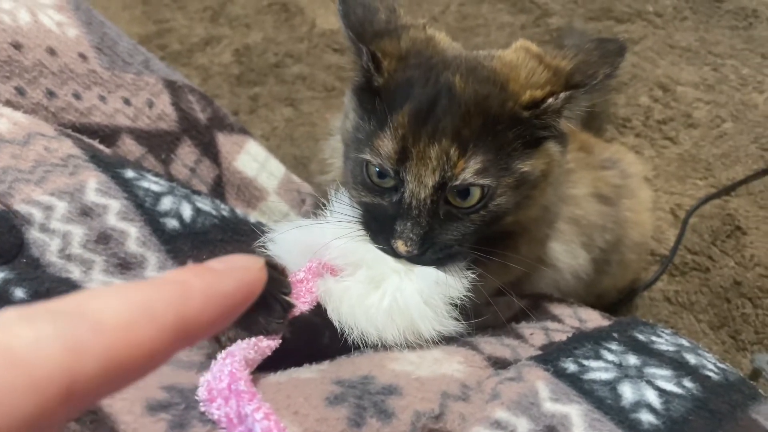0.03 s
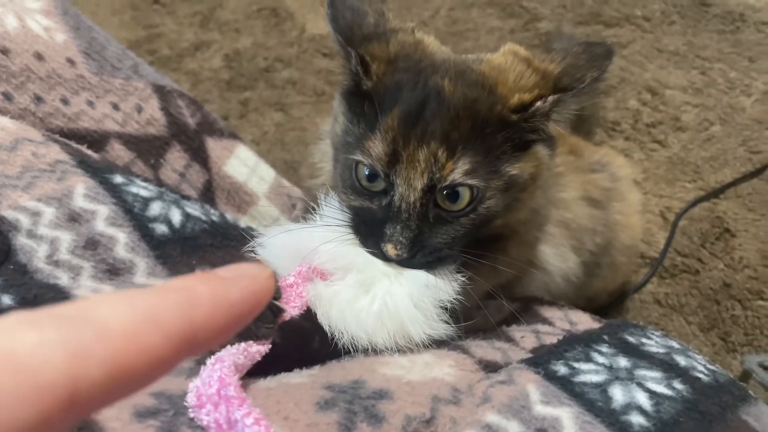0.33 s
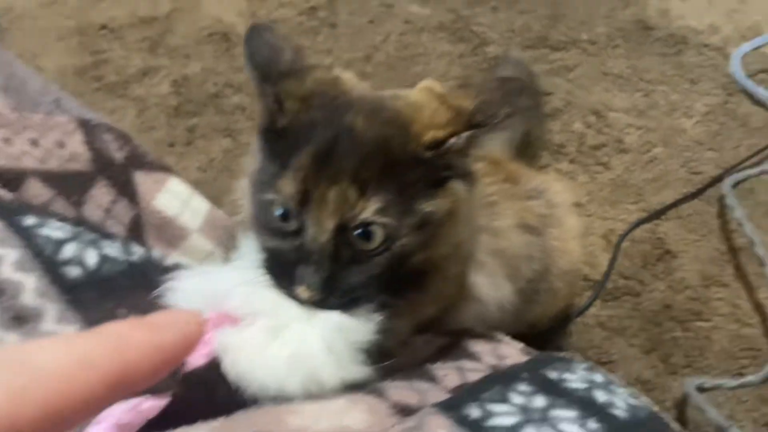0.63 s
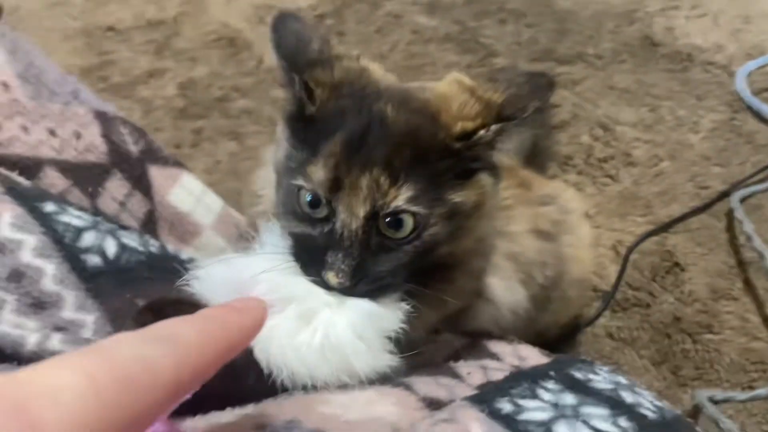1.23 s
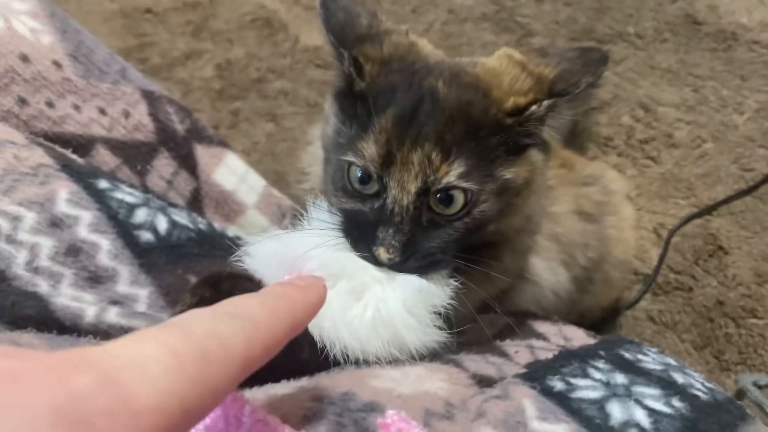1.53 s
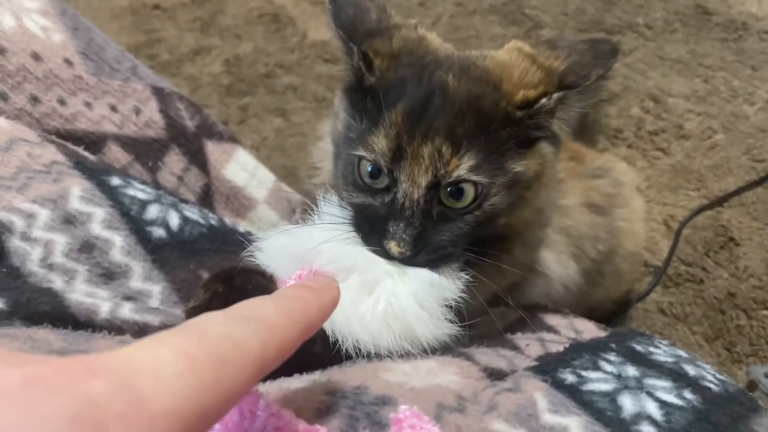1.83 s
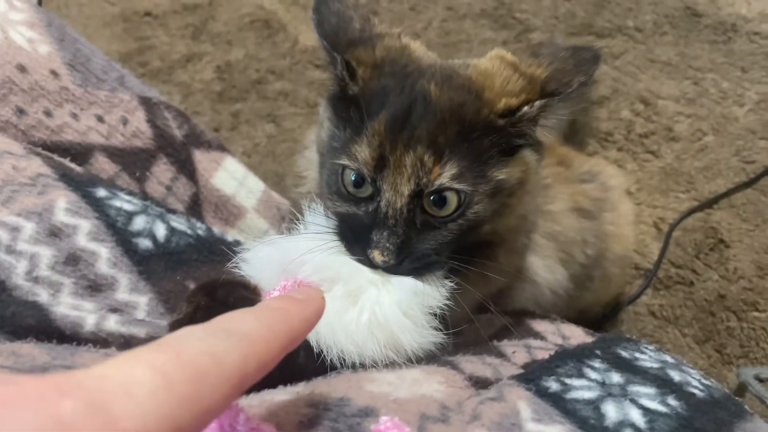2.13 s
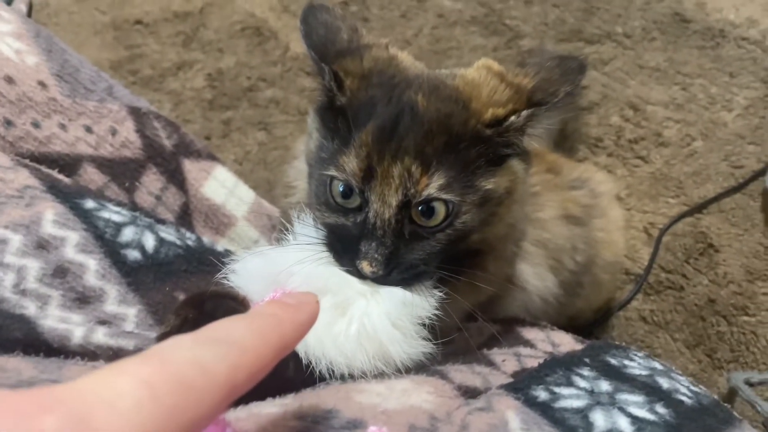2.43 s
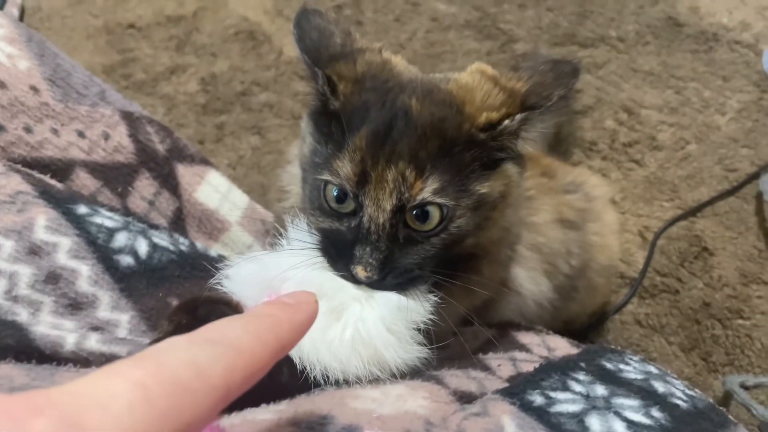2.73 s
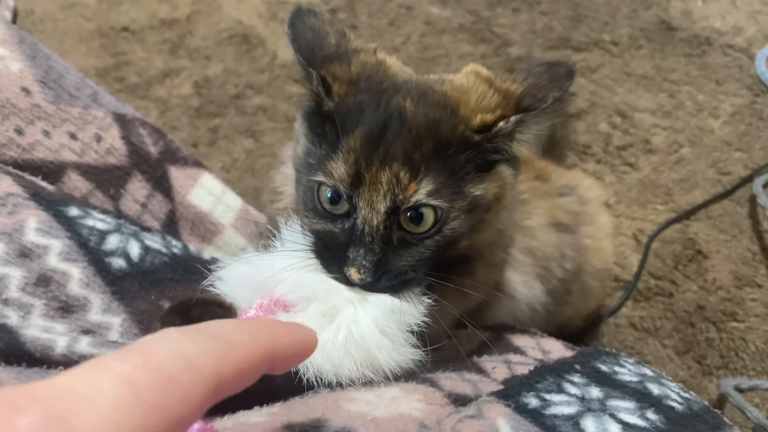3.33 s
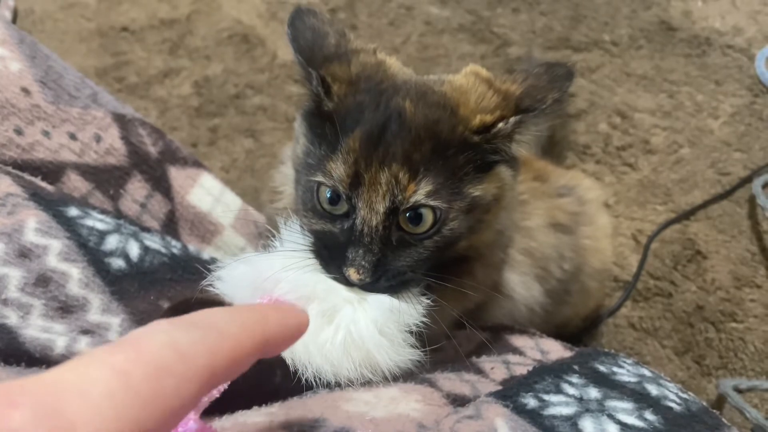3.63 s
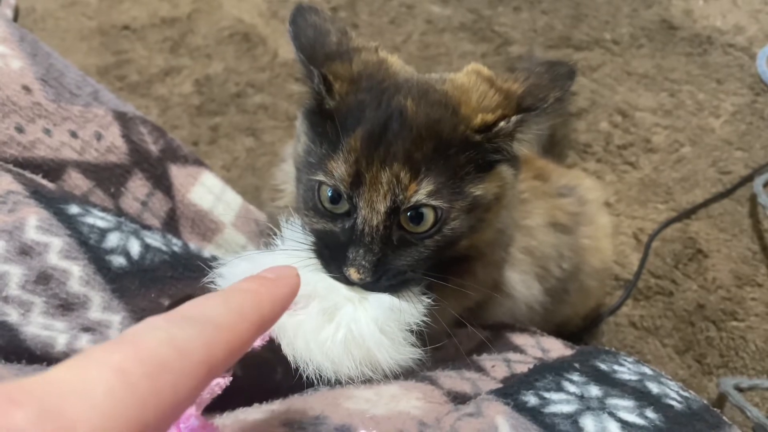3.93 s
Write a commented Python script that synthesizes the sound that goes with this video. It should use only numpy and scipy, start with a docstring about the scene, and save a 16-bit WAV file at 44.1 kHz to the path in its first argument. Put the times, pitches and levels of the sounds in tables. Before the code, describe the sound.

Close by, a kitten growls without a break over a fluffy toy, its tone growing raspy, fluttering and slightly weaker. Early on come a faint scuff of blanket and a soft thud, over a low room hum.

```python
"""One long, low growl, close by: a kitten guards a fluffy toy in a carpeted room.
Its vocal folds pulse through the resonances of throat, mouth and nose. The growl starts clean,
then a flutter on about every third pulse roughens it while pitch and effort sag.
Turbulent air rasps with each pulse. Friction makes the toy and blanket rustle, tick and scuff
faintly, with one soft thud, over a low room hum."""
import sys
import numpy as np
from scipy import signal
from scipy.fft import rfft, irfft
from scipy.io import wavfile
from scipy.ndimage import uniform_filter1d

SR = 44100
rng = np.random.default_rng(int(sys.argv[2]) if len(sys.argv) > 2 else 0)


def digitize_waveform(pressure):
    """Quantize a signal to 16-bit integers and store it at the path in sys.argv[1].

    Rows of a 2-D input are taken as channels; values are limited to [-1, 1].
    """
    field = np.atleast_2d(pressure).T
    bounded = np.clip(field, -1, 1)
    quanta = np.round(bounded * 32767).astype(np.int16)
    wavfile.write(sys.argv[1], SR, quanta)


N = 176400
TIME = np.arange(N) / SR


# Vibration rate of the vocal folds: time_s, pitch_hz
FOLD_PITCH = [(0,166.8),(.06,173.4),(.15,169.3),(.215,179.6),(.265,177.5),(.295,170.8),(.33,174.9),(.385,179.5),(.42,170.5),(.48,169.2),(.52,156.6),(.585,157.2),(.62,168.3),(.645,160.2),(.67,152.7),(.75,157.3),(.8,153.9),(.84,145.6),(.94,153.3),(1.03,157.4),(1.09,163),(1.16,161.2),(1.23,167.2),(1.27,173),(1.33,163.9),(1.43,170.7),(1.455,165.4),(1.48,178.2),(1.53,169.2),(1.6,171.4),(1.64,166.3),(1.7,166.8),(1.77,166.3),(1.81,162.7),(1.87,169.7),(1.95,161.5),(2.08,160.6),(2.14,161.6),(2.28,155.5),(2.36,162),(2.42,155),(2.62,150.7),(2.68,152.7),(2.77,151.3),(2.84,146.5),(2.9,151.2),(3.13,143.6),(3.25,150),(3.42,147.5),(3.47,143),(3.66,144.1),(3.73,134.6),(3.84,139)]
# Roughness of that vibration: time_s, flutter_depth_ratio, irregularity_ratio, flutter_hz
ROUGHNESS = [(0,.2,.15,55),(.12,.22,.15,55),(.2,.05,.05,55),(.48,.05,.05,70),(.53,.42,.2,80),(.575,.32,.14,80),(.6,.12,.07,81),(.645,.12,.08,81),(.675,.7,.6,60),(.74,.55,.4,55),(.9,.48,.32,48),(1.2,.38,.26,50),(1.47,.34,.24,50),(1.7,.38,.26,45),(2.2,.5,.25,47),(2.35,.25,.16,47),(2.45,.58,.28,47.5),(3.38,.68,.28,48.5),(3.5,.8,.5,46),(3.68,.55,.36,43),(3.8,.62,.42,41)]

def vocal_folds(flutter_cycles=.058, flutter_gain=.095, jitter_cycles=.04, shimmer=.09):
    """Phase and amplitude modulation: a flutter slower than the pitch adds rough sidebands."""
    depth, irregularity, flutter_hz = (curve(ROUGHNESS, column) for column in (1, 2, 3))
    pitch_hz = curve(FOLD_PITCH) * (1 + .015 * irregularity * drift(19))
    flutter_phase = 2 * np.pi * np.cumsum(flutter_hz * (1 + .045 * drift(20))) / SR
    cycles = np.cumsum(pitch_hz) / SR + flutter_cycles * depth * np.sin(flutter_phase)
    cycles += jitter_cycles * irregularity * tremble(65)
    throb = depth * np.cos(flutter_phase)
    strength = 1 + flutter_gain * throb + shimmer * irregularity * tremble(55)
    return cycles, strength, throb


def fold_pulses(cycles, strength, lead_cycles=.2):
    """Fourier series of a pulse train: the slow opening of the folds leads their closure."""
    return strength * sum(np.cos(2 * np.pi * (k * cycles + lead_cycles / k)) for k in range(1, 33))


# Response of the throat and closed mouth: frequency_hz, gain_db
THROAT_RESPONSE = [(40,-57),(95,-37),(125,-6),(150,-8.5),(175,-3),(235,-3),(295,-4.5),(350,-7.5),(400,-5.5),(445,0),(520,2),(590,4),(670,-1),(750,0.5),(795,-1.5),(838,-9),(890,-14.5),(1000,-24.5),(1200,-30),(1380,-33),(1600,-39),(1800,-34),(2200,-49),(2800,-46),(3300,-38.5),(4000,-62.5),(6000,-76.5)]
# Mouth resonances, moving with the jaw: time_s, first_hz, second_hz
FORMANTS = [(0,635,1355),(.2,657,1430),(.35,653,1440),(.44,605,1580),(.52,481.4,1590),(.62,509.8,1660),(.72,586,1528),(.85,638,1300),(1,731,1290),(1.2,671.5,1345),(1.5,644,1378),(2.1,653.4,1325),(2.35,667.7,1420),(2.5,726.6,1406),(3.35,734.4,1333),(3.55,715,1325),(3.72,574.6,1300),(3.84,560,1396)]

def vocal_tract(pulses, formant_gain=1.7):
    """Source-filter principle: the pulses excite a steady throat and two moving formants."""
    voice = colour(pulses, THROAT_RESPONSE)
    voice = voice + formant_gain * resonate(voice, curve(FORMANTS, 1), width_hz=100)
    return voice + formant_gain * resonate(voice, curve(FORMANTS, 2), width_hz=160)


# Effort in the three low bands of the voice: time_s, fundamental_db, octave_db, mouth_db
EFFORT = [(0.0, -37, -47, -45.5), (0.06, -39, -40.5, -44), (0.39, -39.5, -41, -43.5),
          (0.47, -41, -38.5, -42), (0.52, -43.5, -43, -46), (0.76, -44.5, -42.5, -45),
          (0.85, -44, -46, -46.5), (1.28, -39, -41.5, -44), (1.6, -40.5, -40, -43.5),
          (2.32, -42.5, -44.5, -46), (2.44, -43.5, -43.5, -46), (3.32, -45.5, -46.5, -48.5),
          (3.68, -47.5, -44, -49.5), (3.81, -53, -46, -50), (3.84, -51, -52.5, -61.5), (3.9, -78, -88, -96)]
# Buzz of the harmonics in the two high bands: time_s, lower_db, upper_db
BUZZ = [(0.0, -57, -71), (0.12, -56.5, -68), (0.219, -58, -64), (0.4, -58.5, -67), (0.489, -58, -69),
        (0.62, -56, -65), (0.69, -56, -79), (0.84, -61.5, -73), (1.02, -58.5, -80), (1.29, -57.5, -69),
        (1.888, -58, -67), (2.45, -62, -76), (2.98, -65, -87), (3.06, -67, -90), (3.64, -67.5, -77),
        (3.73, -68, -84), (3.799, -63.5, -66), (3.86, -87, -97), (3.899, -99, -108)]
# Borders between the five bands: frequency_hz
BAND_EDGES = [215, 378, 920, 1600]
# Offset added to each band's level: gain_db
BAND_TRIMS = [0, 0, 0, 0, -1]

def growl(voice, wobble_db=.4):
    """Time-varying spectral envelope: each band follows its own level as the effort wavers and sags."""
    levels = [curve(EFFORT, 1), curve(EFFORT, 2), curve(EFFORT, 3), curve(BUZZ, 1), curve(BUZZ, 2)]
    bands = steady_bands(voice, BAND_EDGES)
    body = sum(band * amp(level + trim) for band, level, trim in zip(bands, levels, BAND_TRIMS))
    return body * amp(wobble_db * drift(57))


# Nasal twang, strongest while the voice is clear: time_s, level_db
TWANG_LEVEL = [(0,-80),(.14,-81.5),(.22,-66),(.42,-66),(.62,-70),(.72,-77.5),(1.3,-82.5),(2.3,-77),(3.8,-90),(3.84,-110)]
# Response of the nose: frequency_hz, gain_db
NOSE_RESPONSE = [(1000,-54),(1850,-23),(2150,0.5),(2550,-14),(3000,-12),(3250,3.5),(3500,6),(3900,-22.5),(4800,-17),(5600,-28)]

def nasal_twang(pulses):
    """Cavity resonance: the nose picks out harmonics near 2 and 3.5 kHz."""
    return amp(curve(TWANG_LEVEL)) * colour(pulses, NOSE_RESPONSE)


def air_puffs(cycles, throb, leak=.17, lag_cycles=.05, decay_cycles=.3):
    """The folds act as a valve: one uneven, decaying puff of airflow per cycle, over a small leak."""
    puffs = leak + np.exp(-((cycles - lag_cycles) % 1) / decay_cycles)
    uneven_db = 1.5 * tremble(71) + .6 * drift(12)
    return puffs * (1 + .044 * throb) * amp(uneven_db)


# Air rasping through the throat: time_s, level_db
RASP_LEVEL = [(0,-61),(.3,-64.5),(.5,-62),(.7,-63),(.9,-64),(1.25,-60.5),(1.6,-61.5),(2,-62.5),(2.3,-64),(3,-65.5),(3.6,-64.5),(3.81,-66.5),(3.85,-92)]
# Its spectrum: frequency_hz, gain_db
RASP_SPECTRUM = [(200,-24),(900,15),(1400,9.5),(2000,6),(2700,1),(3300,4),(3800,1),(4200,-1),(4800,3.5),(5100,-7),(5500,-30.5),(6200,-11.5),(6900,-17.5),(7700,-23.5),(9000,-27.5),(10500,-20.5),(13000,-36.5)]
# Its likeness between left and right: frequency_hz, coherence_ratio
RASP_COHERENCE = [(500,0.1),(2400,0.61),(3600,1),(4800,1),(5500,0.16),(8000,1),(11000,1)]

def throat_rasp(airflow):
    """Turbulence: noise in the throat swells with each puff of air."""
    return amp(curve(RASP_LEVEL)) * stereo_noise(RASP_SPECTRUM, RASP_COHERENCE, airflow)


# High hiss while the kitten tugs: time_s, level_db
HISS_LEVEL = [(.62,-100),(.77,-80),(.85,-76.5),(1.02,-77.5),(1.14,-79),(1.22,-100)]
# Its spectrum: frequency_hz, gain_db
HISS_SPECTRUM = [(2000,-34),(3100,-9.5),(3500,1),(4200,1),(4700,-2.5),(5400,-14.5),(6300,-11.5),(7500,-26.5),(12000,-39.5)]

def high_hiss(airflow):
    """Amplitude-modulated noise: a band near 4 kHz pulses with the growl."""
    return amp(curve(HISS_LEVEL)) * colour(airflow * rng.standard_normal(N), HISS_SPECTRUM)


# Phase difference between two microphone ports: frequency_hz, left_lead_rad
PORT_PHASE = [(0,0),(170,.2),(350,-.03),(700,.3),(1300,.8),(1800,.7),(2500,1.05),(3000,2.3),(3500,2.95),(4050,3.2),(4500,3.7),(5000,3.9),(5850,3),(6350,0),(7000,.7),(7800,2.7),(9000,1.8),(10400,0)]
# Level difference between them: frequency_hz, left_minus_right_db
PORT_BALANCE = [(60,-6.5),(150,2),(210,5),(310,4),(470,0.5),(700,0.6),(1060,0.5),(1600,-1.5),(2400,-6),(3100,-1.5),(3800,1.5),(4800,-6),(5500,-9),(6200,0),(7800,0.5),(10500,0)]
# Blend from that phase difference towards a pure delay: time_s, blend_ratio
DELAY_BLEND = [(.5,0.016),(.72,0.63),(1.12,0.7),(1.2,0.1)]

def direction(pair, delay_s=.0002):
    """Localisation cues: the kitten reaches the two ports with different phase and level."""
    frames = dict(fs=SR, nperseg=1024, noverlap=768)
    hz, t, spectra = signal.stft(pair, **frames)
    blend = np.interp(t, *np.transpose(DELAY_BLEND))
    lead_rad = np.outer(at_hz(PORT_PHASE, hz), 1 - blend) + np.outer(2 * np.pi * hz * delay_s, blend)
    left_gain = amp(at_hz(PORT_BALANCE, hz) / 2)[:, None] * np.exp(.5j * lead_rad)
    return signal.istft(spectra * np.array([left_gain, 1 / left_gain]), **frames)[1][:, :N]


# Fabric rubbing as the toy is tugged: time_s, level_db
RUB_LEVEL = [(0,-101),(.35,-100.5),(.62,-74.5),(.71,-78),(.785,-73),(.82,-88),(1.1,-77.5),(1.25,-85),(3.8,-97.5)]
# Its spectrum: frequency_hz, gain_db
RUB_SPECTRUM = [(300,2),(2000,2.5),(3700,-1),(4800,7.5),(6000,-4.5),(7500,-6.5),(9000,-18.5),(12000,-14),(15000,-16)]

def fabric_rub(grain_db=3):
    """Sliding friction: toy on blanket makes noise with a grainy envelope."""
    grain = amp(grain_db * drift(270))
    return amp(curve(RUB_LEVEL)) * stereo_noise(RUB_SPECTRUM, [(100, .93), (10000, .63)], grain)


# Spectrum of one crisp scuff: frequency_hz, gain_db
SCUFF_SPECTRUM = [(300,-1),(2000,2),(3700,0),(5000,3.5),(6200,-0.5),(7500,-3),(9000,-11.5),(12000,-15),(15000,-23)]

def toy_scuff(peak_s=.733, rise_s=.011, fall_s=.021, level_db=-63, grain_db=3):
    """Stick-slip friction: the toy slips once over the blanket in a short burst of fibre snaps."""
    t = TIME - peak_s
    stroke = np.exp(np.minimum(t / rise_s, -t / fall_s))
    grain = amp(grain_db * drift(900))
    return amp(level_db) * stroke * stereo_noise(SCUFF_SPECTRUM, [(100, .9), (10000, .62)], grain)


# Small ticks of fur and fabric: start_s, level_db
TICKS = [(1.078,-79),(1.368,-85),(1.7634,-79),(1.91,-79),(2.8868,-77.5)]
# Their spectrum: frequency_hz, gain_db
TICK_SPECTRUM = [(1000,-25.5),(4000,-9),(6500,12),(9000,0),(13000,-9.5)]

def fabric_ticks(decay_s=.006):
    """Damped transients: bright noise starts abruptly and decays exponentially."""
    snaps = sum(amp(db) * (TIME >= start) * np.exp(-abs(TIME - start) / decay_s) for start, db in TICKS)
    return snaps * stereo_noise(TICK_SPECTRUM, [(100, 1), (10000, .5)])


# Spectrum of the thud of toy and blanket: frequency_hz, gain_db
THUD_SPECTRUM = [(15,-24),(35,-6),(52,-1),(80,-3),(200,-32),(800,-93)]

def soft_thud(peak_s=.77, width_s=.04, level_db=-54):
    """Soft impact: a slow, smooth contact holds only low frequencies."""
    swell = np.exp(-((TIME - peak_s) / width_s) ** 2)
    return amp(level_db) * swell * stereo_noise(THUD_SPECTRUM, ROOM_COHERENCE)


def reverberation(x, t60_s=.2, gap_s=.004, gain_db=-21):
    """Absorption: reflections in a carpeted room die away in a short exponential tail."""
    t = TIME[:16000]
    tail = rng.standard_normal((2, len(t))) * amp(-60 * t / t60_s) * (t > gap_s)
    tail /= np.linalg.norm(tail[0])
    return amp(gain_db) * signal.fftconvolve(x, tail, axes=1)[:, :N]


# Background noise of the room: frequency_hz, gain_db
ROOM_SPECTRUM = [(15,-32.5),(30,-21.5),(47,-2.5),(58,5),(72,2),(100,1),(140,-0.5),(175,-12),(220,-23.5),(400,-18),(800,-33),(1300,-38.5),(3000,-41.5),(6000,-45.5),(10000,-53),(14000,-53.5)]
# Left-right likeness of this noise and of the thud: frequency_hz, coherence_ratio
ROOM_COHERENCE = [(30,1),(100,0.76),(400,0.85),(1500,0.34),(8000,0.11)]

def room_hum(hum_hz=70.5, hum_db=-69, waver_rad=.31, noise_db=-59.5):
    """Ambient noise floor: a phase-modulated tone within low rumble and faint hiss."""
    hum = unit_rms(np.sin(2 * np.pi * hum_hz * TIME + waver_rad * drift(15)))
    return amp(hum_db) * hum + amp(noise_db) * stereo_noise(ROOM_SPECTRUM, ROOM_COHERENCE)


def amp(db):
    """Decibels to amplitude ratio."""
    return 10 ** (np.asarray(db) / 20)


def unit_rms(x):
    """Normalisation to an rms of 1."""
    return x / np.sqrt(np.mean(x ** 2) + 1e-20)


def curve(table, column=1):
    """Linear interpolation of one column of a time table at every sample."""
    rows = np.array(table)
    return np.interp(TIME, rows[:, 0], rows[:, column])


def at_hz(table, hz):
    """Interpolation of a frequency table on a logarithmic axis."""
    table_hz, values = np.transpose(table)
    return np.interp(np.log(hz + 1), np.log(table_hz + 1), values)


def drift(hz):
    """Low-pass noise: random wandering up to about the given rate."""
    ratio = np.fft.rfftfreq(N, 1 / SR) / hz
    return unit_rms(irfft(rfft(rng.standard_normal(N)) * np.exp(-ratio ** 2), N))


def tremble(hz):
    """Band-pass noise: random fluctuation around the given rate, with no slow part."""
    ratio = np.fft.rfftfreq(N, 1 / SR) / hz
    return unit_rms(irfft(rfft(rng.standard_normal(N)) * ratio * np.exp(-ratio ** 2), N))


def colour(x, spectrum):
    """Minimum-phase filtering to the given spectral shape; the result has an rms of 1."""
    log_gain = np.log(amp(at_hz(spectrum, abs(np.fft.fftfreq(4096, 1 / SR)))))
    impulse_response = np.fft.ifft(np.exp(np.conj(signal.hilbert(log_gain)))).real
    return unit_rms(signal.fftconvolve(x, impulse_response)[:N])


def stereo_noise(spectrum, coherence, envelope=1):
    """Partial coherence: two noises, alike by (frequency_hz, coherence_ratio), modulated and coloured."""
    left, independent = rfft(rng.standard_normal((2, N)))
    shared = np.clip(at_hz(coherence, np.fft.rfftfreq(N, 1 / SR)), -1, 1)
    right = shared * left + np.sqrt(1 - shared ** 2) * independent
    return np.array([colour(envelope * irfft(side, N), spectrum) for side in (left, right)])


def resonate(x, hz, width_hz):
    """A damped resonance of gain 1 whose centre follows the curve hz."""
    carrier = np.exp(2j * np.pi * np.cumsum(hz) / SR)
    pole = np.exp(-np.pi * width_hz / SR)
    return 2 * (carrier * signal.lfilter([1 - pole], [1, -pole], x / carrier)).real


def steady_bands(x, edges_hz, window=4500):
    """A filter bank, low to high, with each band divided by its own running rms."""
    hz = np.fft.rfftfreq(2 * N, 1 / SR)
    low_passes = [1 / (1 + (hz / edge) ** 24) for edge in edges_hz]
    band_passes = np.diff(low_passes, axis=0, prepend=0, append=1)
    bands = irfft(rfft(x, 2 * N) * band_passes)[:, :N]
    power = uniform_filter1d(uniform_filter1d(bands ** 2, window), window)
    return bands / np.sqrt(power + 1e-12)


def scene():
    """Superposition of the kitten, its reverberation, the fabric and the room hum."""
    cycles, strength, throb = vocal_folds()
    pulses = fold_pulses(cycles, strength)
    airflow = air_puffs(cycles, throb)
    rasp, hiss = throat_rasp(airflow), high_hiss(airflow)
    voice = growl(vocal_tract(pulses)) + nasal_twang(pulses)
    kitten = direction(voice + rasp) + hiss
    reflections = reverberation(kitten)
    fabric = fabric_rub() + fabric_ticks() + soft_thud() + toy_scuff()
    return kitten + reflections + fabric + room_hum()


def record(dry, cutoff_hz=13100):
    """Band limiting: a linear-phase low-pass filter removes the highest treble."""
    low_pass = signal.firwin(511, cutoff_hz, window=("kaiser", 9), fs=SR)
    return signal.oaconvolve(dry, low_pass[None], "same")


dry = scene()
out = record(dry)
digitize_waveform(out)
```